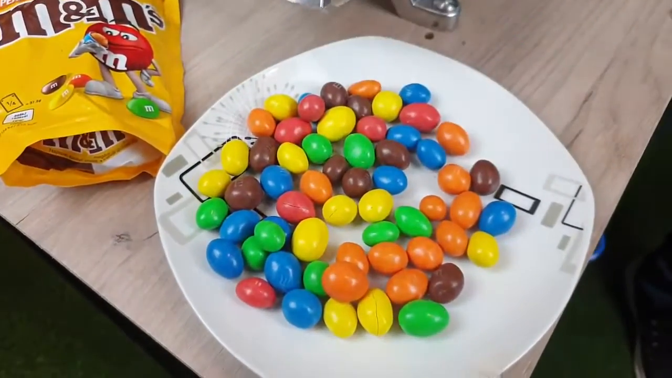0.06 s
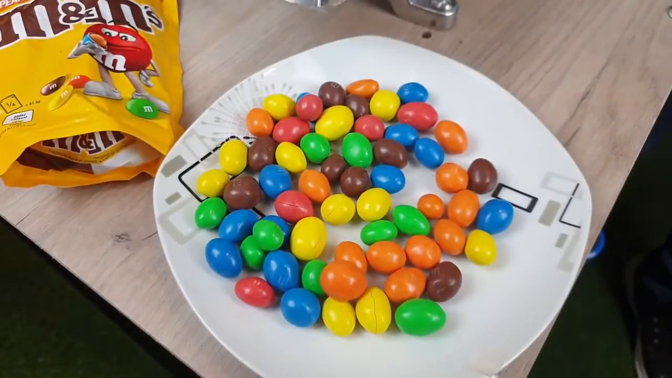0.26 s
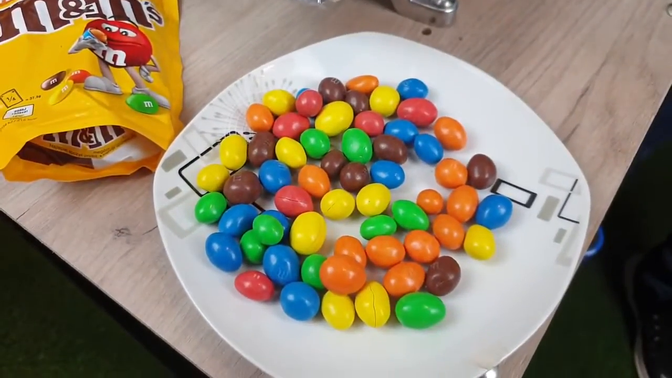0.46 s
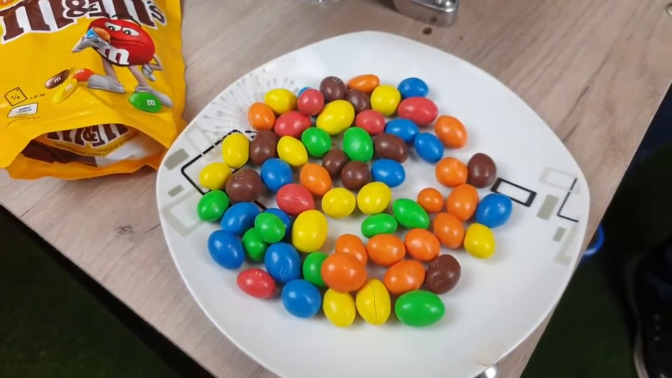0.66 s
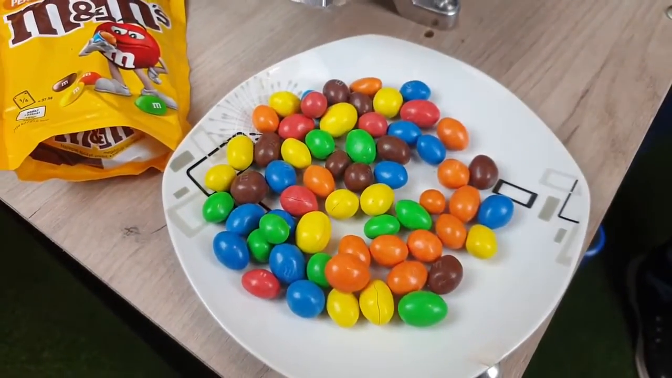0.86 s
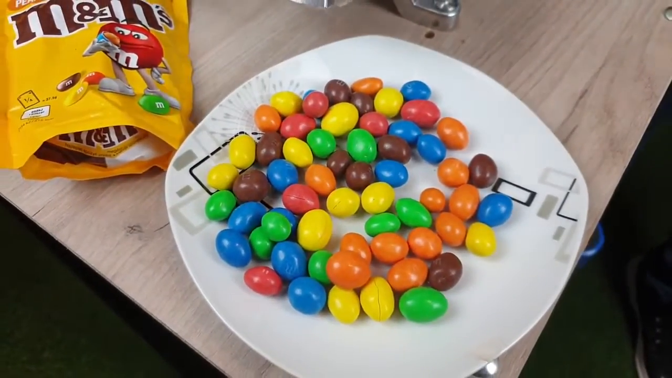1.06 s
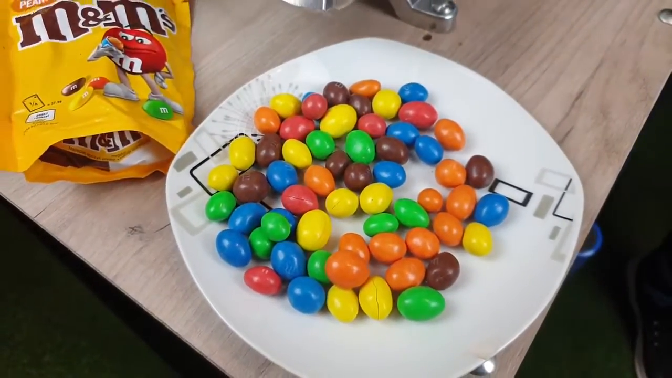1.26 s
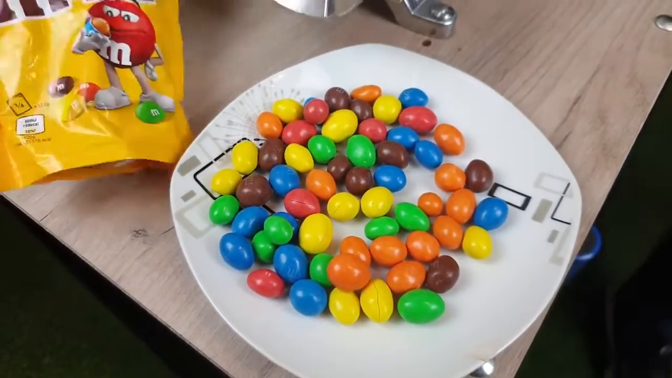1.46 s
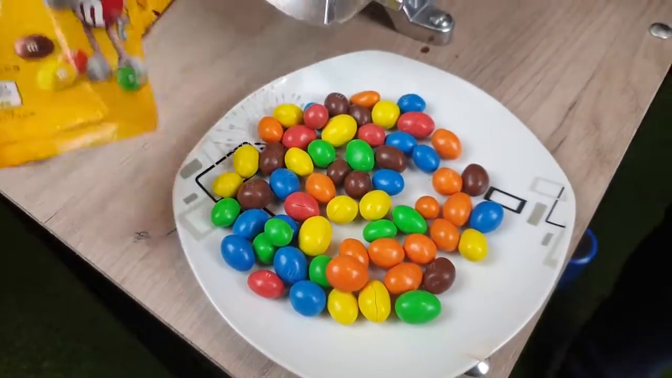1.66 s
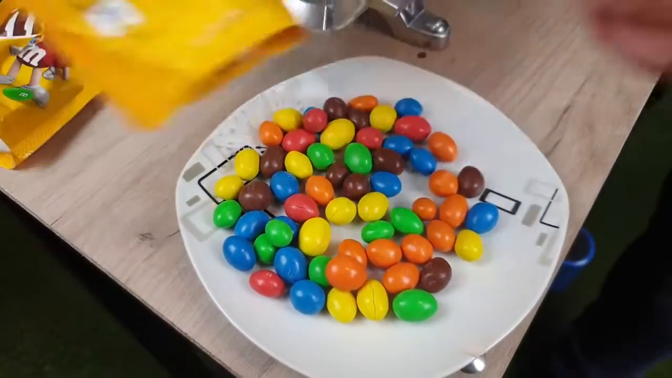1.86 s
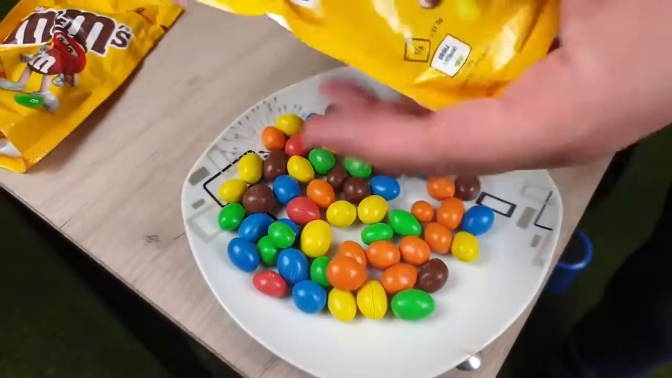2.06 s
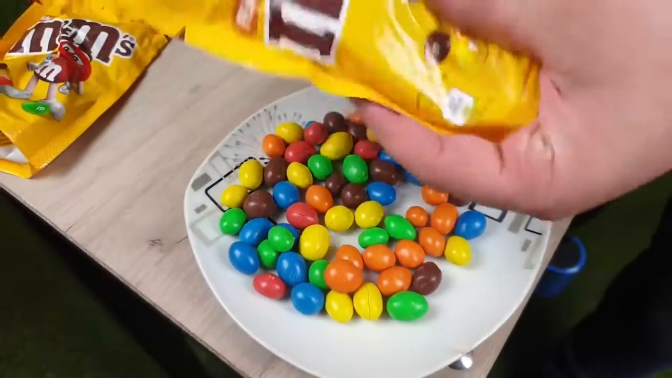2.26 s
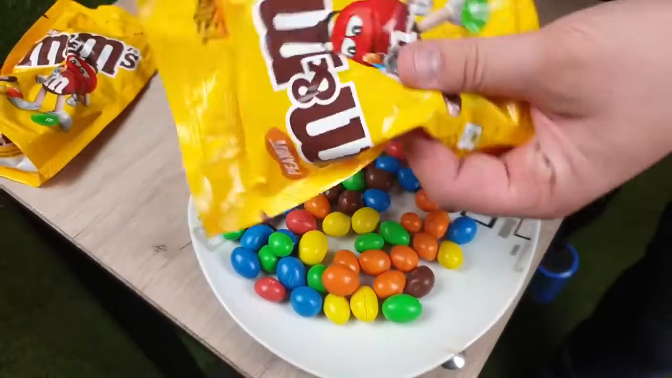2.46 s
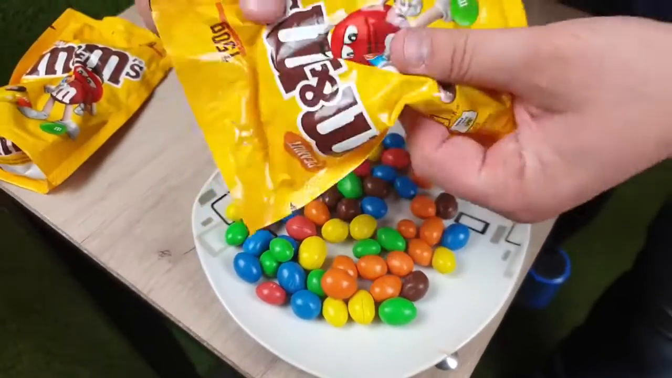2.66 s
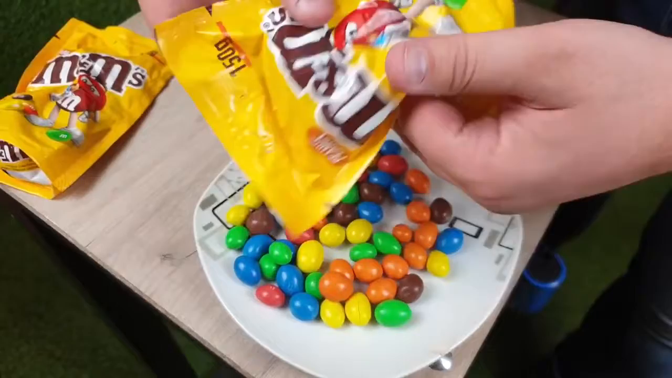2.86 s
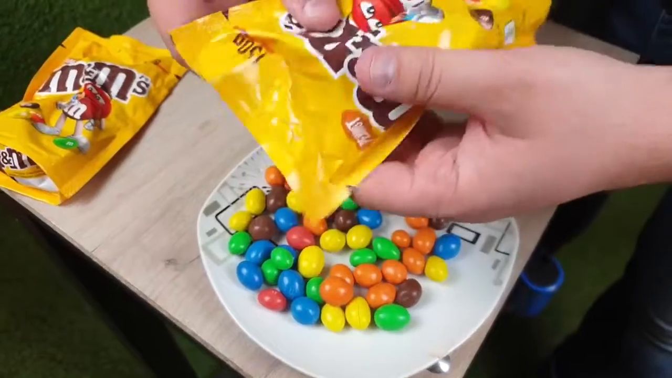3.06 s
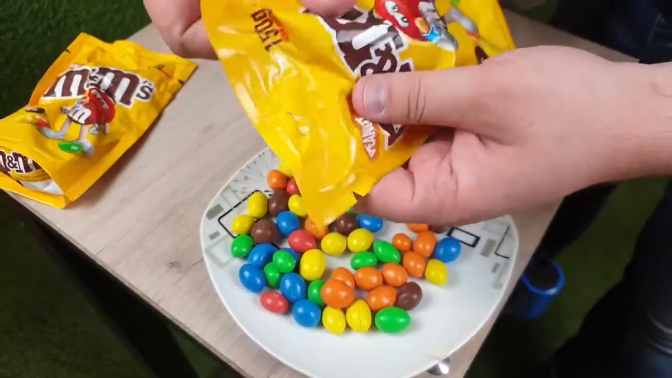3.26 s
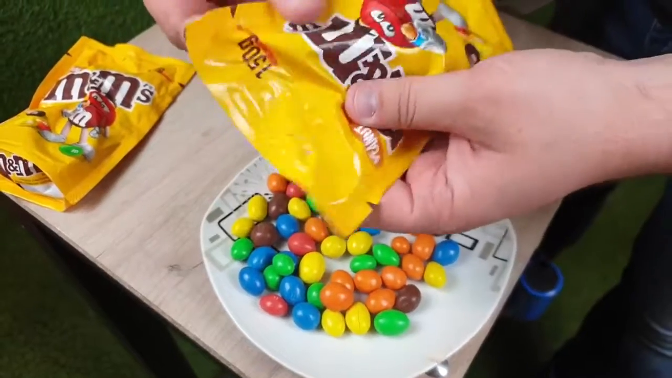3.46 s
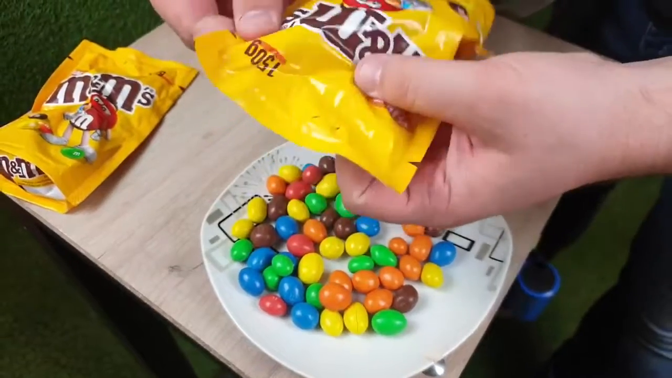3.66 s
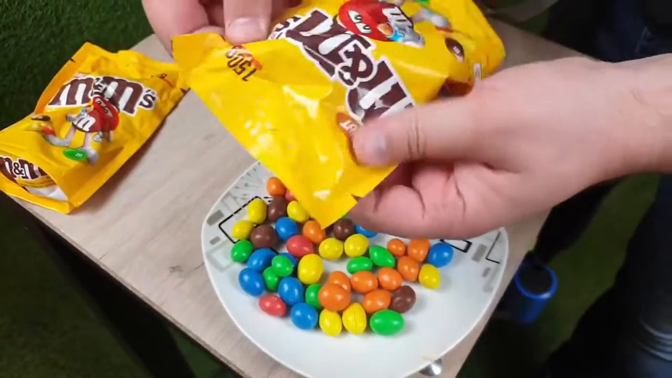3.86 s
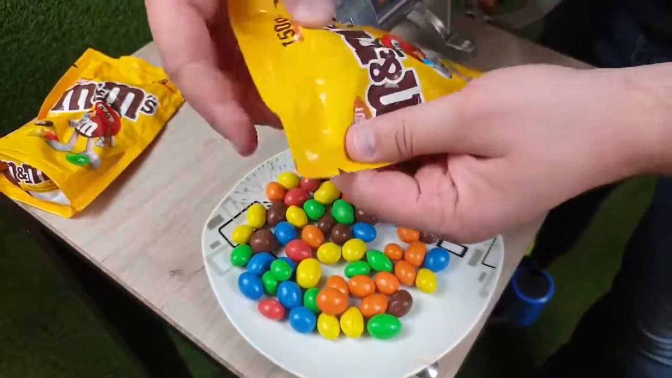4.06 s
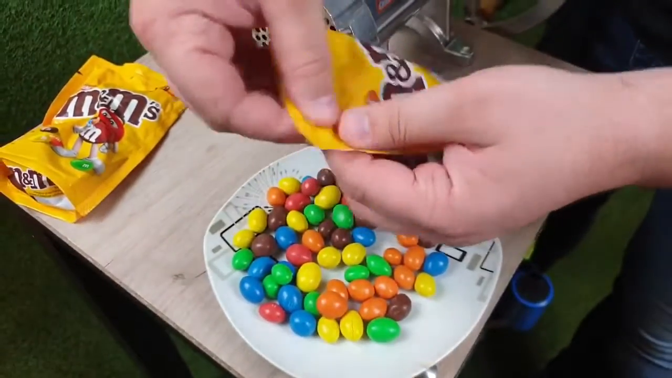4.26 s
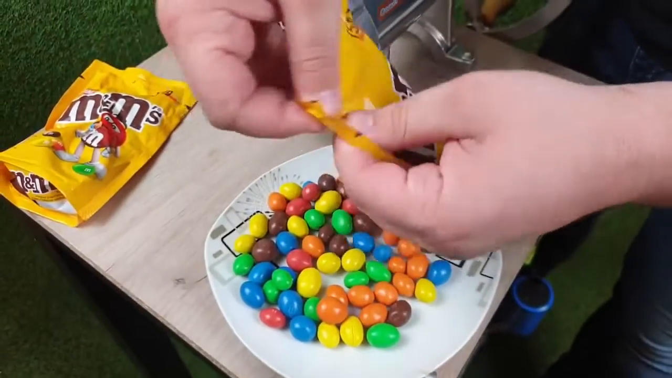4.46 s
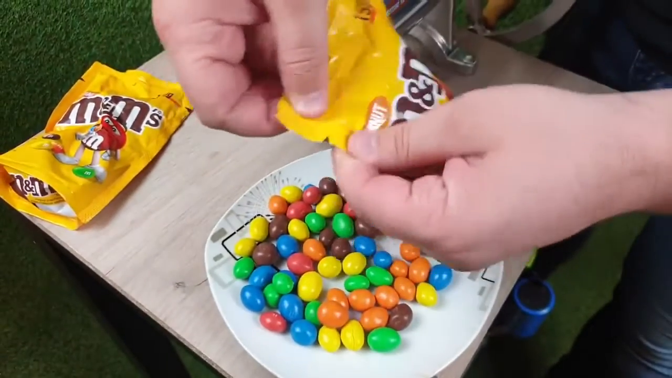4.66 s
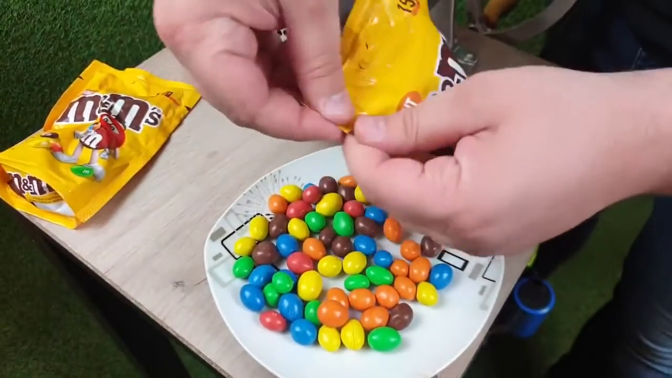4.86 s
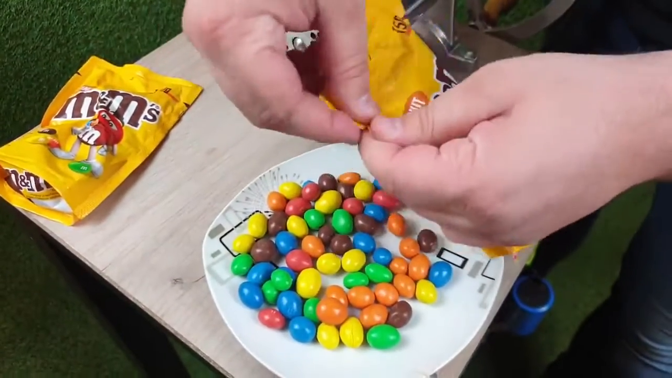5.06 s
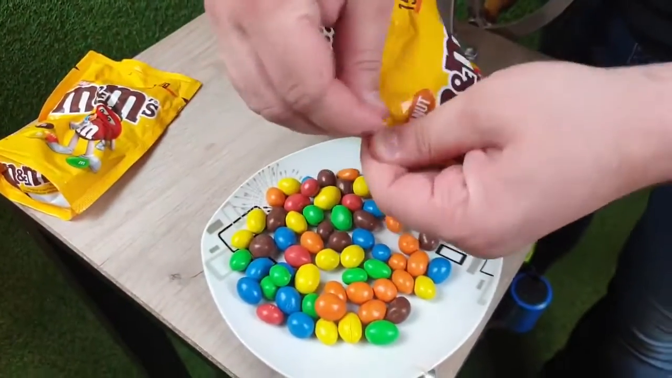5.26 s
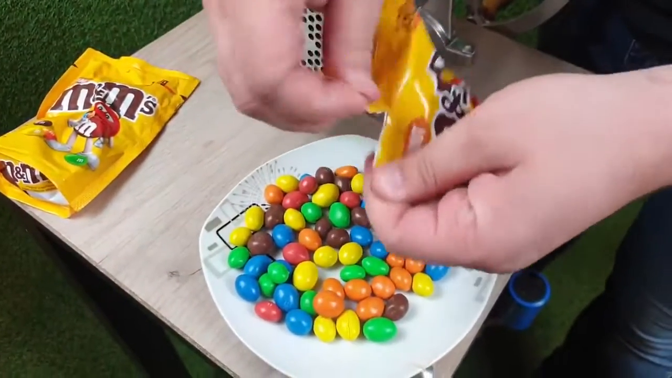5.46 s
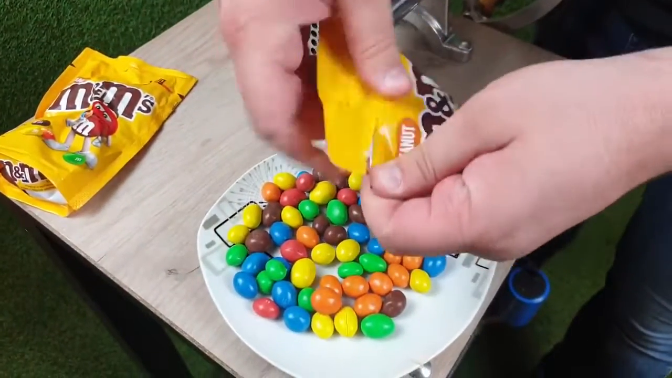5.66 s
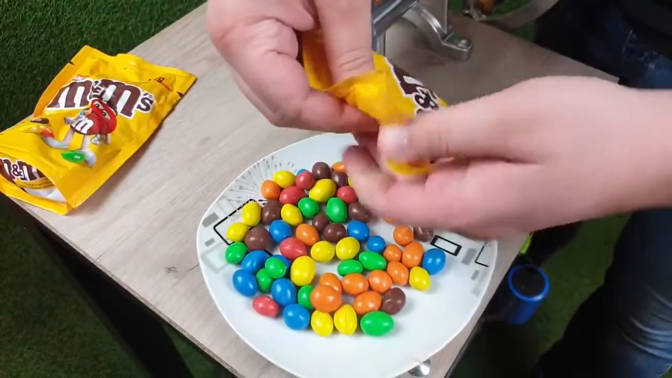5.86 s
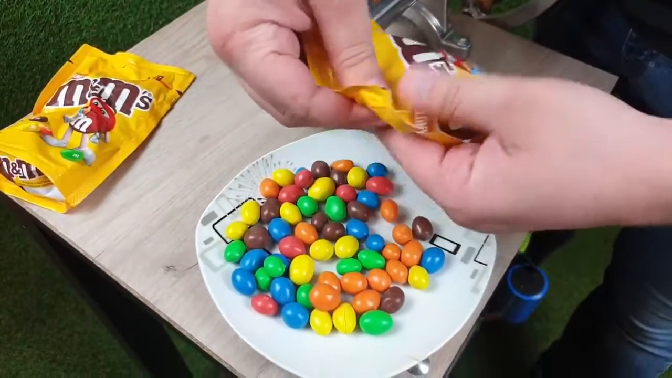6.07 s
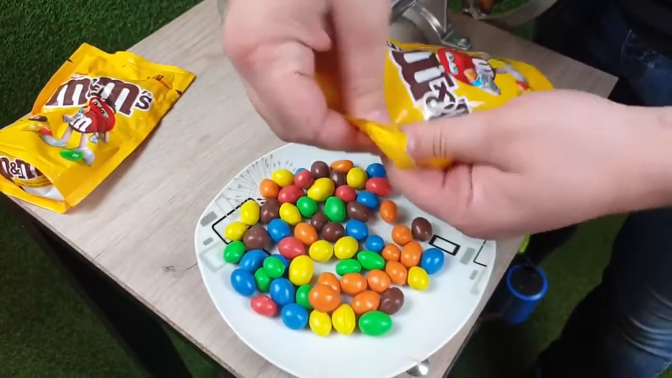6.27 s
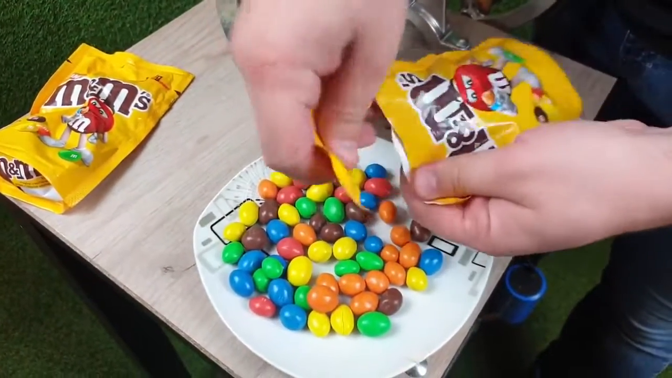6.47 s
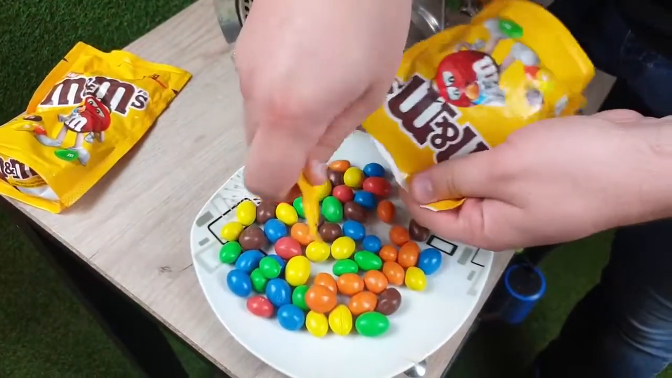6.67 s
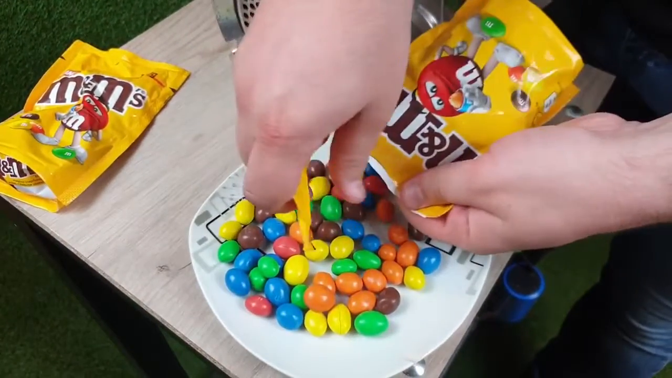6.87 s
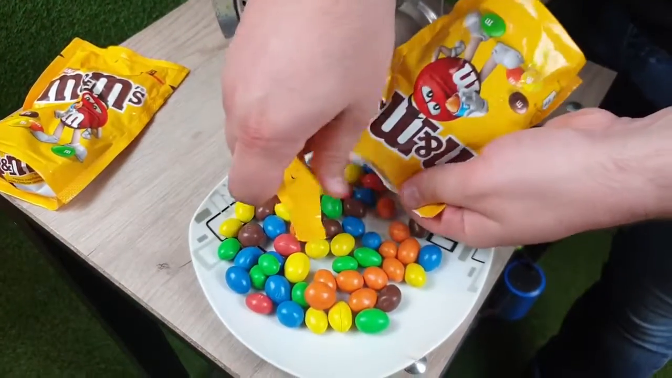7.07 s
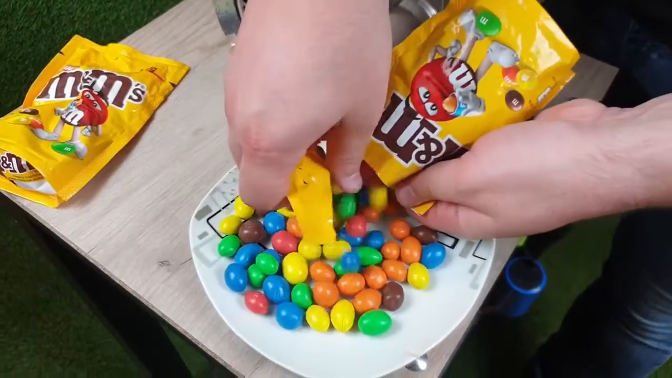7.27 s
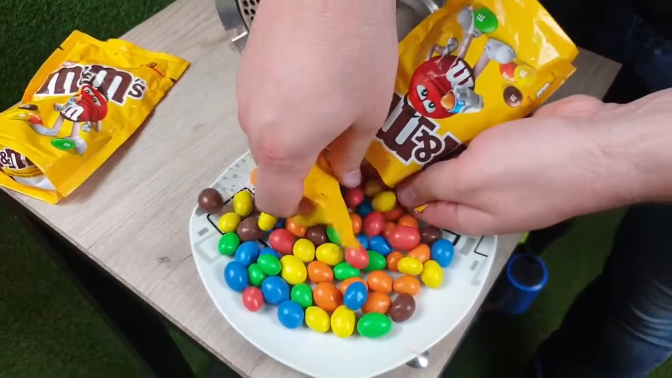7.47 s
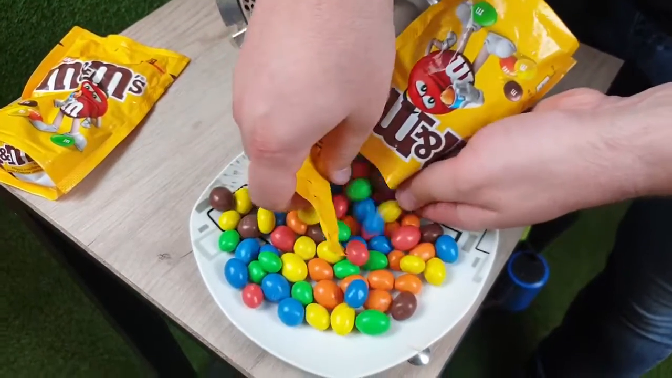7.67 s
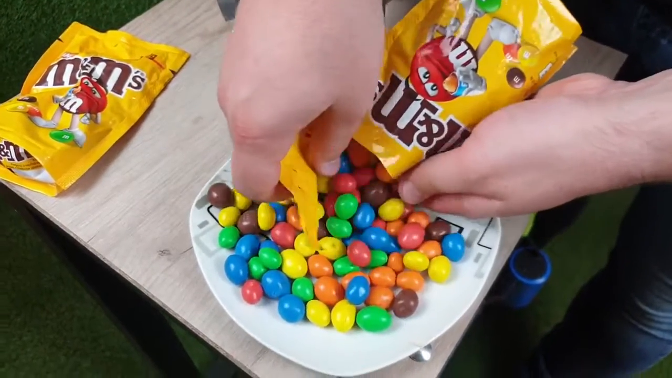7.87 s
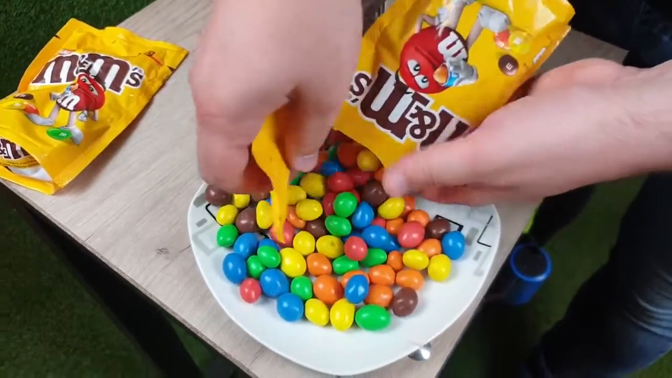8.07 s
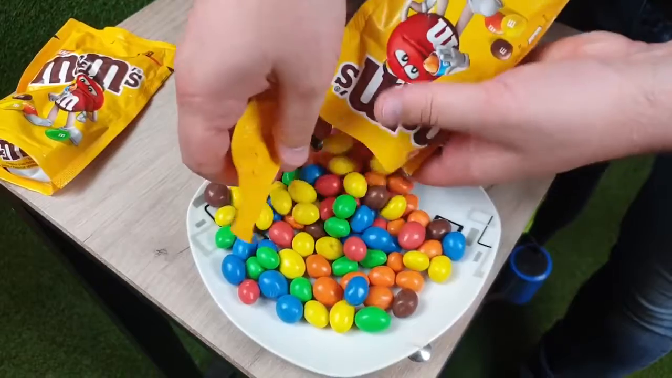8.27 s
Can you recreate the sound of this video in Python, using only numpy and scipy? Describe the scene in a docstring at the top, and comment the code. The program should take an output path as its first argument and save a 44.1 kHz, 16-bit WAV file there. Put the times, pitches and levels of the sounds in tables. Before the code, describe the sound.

Close by in a small room, a thin plastic bag is lifted, crumpled and torn open, giving irregular crackles, sharp snaps and small hollow pops over very faint hiss. Near the end, hard-shelled candies tumble out and click rapidly onto a porcelain plate already holding others, making it ring lightly. The pour dies away in under a second, and a few soft clicks follow as the heap is nudged.

```python
"""A low hum swells and fades a few times over faint hiss and light brushes. Close by, hands lift a
plastic candy bag, crumple it and tear off its top strip: the film buckles under each grip, so creases
snap, panels pop and countless tiny creases merge into a crinkle. Then hard-shelled candies tumble in
the bag and pour onto a porcelain plate already strewn with them: each impact clicks and excites the
plate's modes, which the growing heap damps. A hand nudges the heap. A small room reverberates."""
import sys
import numpy as np
from scipy import signal
from scipy.fft import rfft, irfft, next_fast_len
from scipy.io import wavfile
from scipy.ndimage import uniform_filter1d, map_coordinates

SR = 44100
rng = np.random.default_rng(int(sys.argv[2]) if len(sys.argv) > 2 else 0)


def generate_wav(sig):
    """Save sig (samples, or channels by samples) to the path in sys.argv[1] as 16-bit PCM at SR."""
    pcm = np.round(np.clip(np.atleast_2d(sig).T, -1, 1) * 32767).astype(np.int16)
    wavfile.write(sys.argv[1], SR, pcm)


N = 366471
TIME = np.arange(N) / SR


def amp(db):
    """Amplitude ratio of a level in decibels."""
    return 10 ** (np.asarray(db) / 20)


def unit(x):
    """Normalisation to an rms of 1."""
    return x / np.sqrt(np.mean(x ** 2) + 1e-20)


def fade(t, t60):
    """Exponential free decay, 60 dB down after t60 seconds."""
    return np.exp(-np.log(1000) * t / t60)


def along(points, hz):
    """Interpolation of (frequency, value) points on a logarithmic frequency axis."""
    knots_hz, values = np.transpose(points)
    return np.interp(np.log(hz + 1), np.log(knots_hz), values)


def wobble(rate):
    """Smooth random modulation, with rate knots a second."""
    knots = rng.standard_normal(int(N * rate / SR) + 4)
    return map_coordinates(knots, [np.arange(N) * rate / SR], order=2)


def filtered(x, response):
    """Linear filtering: the spectrum of x times a frequency response."""
    size = next_fast_len(N + SR // 4)
    return irfft(rfft(x, size) * response(np.fft.rfftfreq(size, 1 / SR)), size)[..., :N]


def coloured(x, spectrum):
    """Spectral shaping by (frequency, level) points, at an rms of 1."""
    return unit(filtered(x, lambda hz: amp(along(spectrum, hz))))


def add(track, s, sound):
    """Superposition of a sound on a track from time s."""
    part = track[..., max(round(s * SR), 0):][..., :sound.shape[-1]]
    part += sound[..., :part.shape[-1]]


def swells(rows, attack_s, t60, sag_db_per_s):
    """Power summation, in dB, of (start, length, level) events that rise, hold on a slope and decay."""
    power = np.zeros(N)
    for s, length, db in rows:
        t = np.arange(int((length + t60) * SR)) / SR
        hold = amp(db - sag_db_per_s * (t - length / 2))
        gain = hold * np.minimum(t / attack_s, 1) * fade(np.maximum(t - length, 0), t60)
        add(power, s, gain[max(round(-s * SR), 0):] ** 2)
    return 10 * np.log10(power + 1e-12)


def bursts(times, levels_db, spectrum, t60, after_db, after_t60, ripple_db, size=4096):
    """Impulsive excitation: noise with a two-stage decay drives random resonances, new for each burst."""
    track, t, hz = np.zeros((2, N)), np.arange(size) / SR, np.fft.rfftfreq(size, 1 / SR)
    envelope = fade(t, t60) + amp(after_db) * fade(t, after_t60)
    knots_hz = np.geomspace(200, 18000, 36)
    for s, db in zip(times, levels_db):
        ripple = np.interp(hz, knots_hz, rng.standard_normal(len(knots_hz)))
        cepstrum = irfft(np.log(amp(along(spectrum, hz) + ripple_db * ripple)))
        minimum_phase = np.exp(rfft(2 * cepstrum[:size // 2], size) - cepstrum[0])
        burst = irfft(rfft(envelope * rng.standard_normal((2, size))) * minimum_phase)
        add(track, s, amp(db) * unit(burst) * np.sqrt(.005 * SR / size))  # energy of 5 ms at this level
    return track


# Likeness of left and right: (frequency [Hz], coherence [0 to 1])
COHERENCE = [(100, 0.88), (600, 0.84), (1500, 0.58), (4000, 0.054)]
def placed(pair, balance_db):
    """Partial coherence and a level difference turn two independent signals into one stereo source."""
    def blend(hz):
        angle = np.arccos(np.clip(along(COHERENCE, hz), 0, 1)) / 2
        return np.array([np.cos(angle), np.sin(angle)])

    def lean(hz):
        gain = amp(np.array([[1], [-1]]) * along(balance_db, hz) / 2)
        return gain / np.sqrt(np.mean(gain ** 2, axis=0))
    mid, side = filtered(pair, blend)
    return filtered(np.array([mid + side, mid - side]), lean)


# Decay of the small room: (frequency [Hz], reverberation time [s])
ROOM_T60 = [(150, 0.41), (800, 0.15), (4000, 0.19), (14000, 0.053)]
def room(x):
    """Reverberation: convolution with a diffuse tail whose treble dies first."""
    hz, t, noise = signal.stft(rng.standard_normal((2, SR // 2)), SR, nperseg=256)
    tail = signal.istft(noise * amp(-60 * t / along(ROOM_T60, hz)[:, None]), SR, nperseg=256)[1]
    tail *= 1 - np.exp(-np.arange(tail.shape[1]) / SR / 0.00013)
    return signal.fftconvolve(x, tail / np.linalg.norm(tail[0]), axes=1)[:, :N]


# Spectra of the room hiss and of a brush: (frequency [Hz], relative spectral density [dB])
HISS_SPECTRUM = [(25, -19), (150, -4.5), (500, -13), (1400, -7.5), (3000, -16), (5800, -9), (15000, -24)]
BRUSH_SPECTRUM = [(230, -1), (500, -8.5), (1500, -6.5), (8500, -15)]
# Light brushes before the bag is lifted: (start [s], length [s], level [dB])
BRUSH_STROKES = [(0, 0.04, -66), (.237, 0.022, -66.5), (.585, 0.073, -58)]
def background():
    """Broadband noise: a steady room hiss, and the friction of a few light brushes."""
    hiss = coloured(rng.standard_normal((2, N)), HISS_SPECTRUM)
    brush = coloured(rng.standard_normal((2, N)), BRUSH_SPECTRUM)
    brush_db = swells(BRUSH_STROKES, attack_s=0.0069, t60=0.47, sag_db_per_s=22)
    return amp(-75) * hiss + amp(brush_db) * brush


# Swells of the low hum: (start [s], length [s], relative level [dB])
HUM_SWELLS = [(-.06, 0.2, -56), (.33, 0.36, -54), (.88, 0.53, -48.5), (1.7, 0.57, -51)]
def hum(pitch_hz=66.5):
    """Amplitude and frequency modulation: a low tone swells and wavers."""
    level_db = swells(HUM_SWELLS, attack_s=0.13, t60=0.57, sag_db_per_s=-9) - 7
    hz = pitch_hz + 0.5 * wobble(7.6)
    return amp(level_db) * unit(np.sin(2 * np.pi * np.cumsum(hz) / SR))


# Bumps of the filled bag in the hands: (time [s], level [dB], nominal pitch [Hz])
BAG_BUMPS = [(3.038, -32, 58.7), (3.576, -43, 131), (4.04, -40, 197), (4.899, -37, 116), (5.175, -41, 128),
             (5.78, -28.5, 101), (6.928, -39, 88)]
def bumps():
    """Soft impact: the heavy bag settles on the fingers with a sinking tone in a puff of rumble."""
    track, t = np.zeros((2, N)), np.arange(SR // 4) / SR
    envelope = fade(t, 0.049) * (1 - np.exp(-t / 0.0017))
    for s, db, hz in BAG_BUMPS:
        sinking_hz = hz * (0.92 + .5 * fade(t, 0.027))
        tone = np.sin(2 * np.pi * np.cumsum(sinking_hz) / SR)
        rumble = unit(signal.lfilter(*signal.butter(2, hz, fs=SR), rng.standard_normal((2, len(t)))))
        add(track, s, amp(db - 0.5) * (tone + .5 * rumble) * envelope)
    return track


HOLD_FROM_S, HOLD_TO_S = 1.35, 7.3  # the bag is in the hands
TAUT_UNTIL_S, SLACK_FROM_S = 1.95, 2.45  # the other hand takes its weight
# Colour of taut panels against slack ones: (frequency [Hz], gain [dB])
TAUT_COLOUR = [(300, 1.5), (850, -2), (1300, -6.5), (2000, 6.5), (3500, 1)]
def taut(panels):
    """Membrane tension: the panels sound higher while the weight of the candies stretches the film."""
    stretch = np.interp(TIME, [TAUT_UNTIL_S, SLACK_FROM_S], [1, 0])
    return panels + stretch * filtered(panels, lambda hz: amp(along(TAUT_COLOUR, hz)) - 1)


def short_rings(rows, t60=0.012):
    """Damped oscillation: one brief tone for each (time, level, pitch) row."""
    track, t = np.zeros((2, N)), np.arange(SR // 20) / SR
    for s, db, hz in rows:
        phase_cycles = np.array([[0], [rng.random()]])
        ring = np.sin(2 * np.pi * (hz * t + phase_cycles))
        add(track, s, amp(db) * ring * fade(t, t60) * (1 - np.exp(-t * hz)))
    return track


# Hollow pops of the bag, and dull knocks of candies tumbling inside just before the pour:
# (time [s], relative level [dB], pitch [Hz])
POPS_AND_KNOCKS = [(2.576, -30.5, 1010), (2.717, -36, 1550), (3.261, -25.5, 860), (3.695, -33.5, 915),
                   (4.336, -37, 840), (5.116, -40.5, 1000), (6.829, -33.5, 1650), (3.8, -36.5, 358),
                   (4.45, -28, 870), (4.65, -37.5, 388), (3.948, -35.5, 1200), (5.286, -36, 980),
                   (7.247, -33, 1140), (7.274, -37, 1680), (7.298, -34.5, 467), (8.008, -47, 1500),
                   (8.099, -46, 1110)]
def pops_and_knocks(flex_db, count=320, centre_hz=1030, spread_db=10):
    """Resonance: the hollow bag rings as panels pop or candies knock; random pops follow its flexing."""
    clear = amp(16.5) * short_rings(POPS_AND_KNOCKS)
    slot, strength, pitch = rng.random((count, 3)).T
    times = SLACK_FROM_S + (np.arange(count) + slot) / count * (N / SR - SLACK_FROM_S)
    levels_db = np.interp(times, TIME, flex_db) - 5 + spread_db * strength ** 2
    hz = centre_hz * 2 ** (2 * pitch - 1)  # within an octave either way
    return clear + short_rings(zip(times, levels_db, hz))


# Spectra of a cracking crease and a flapping panel: (frequency [Hz], relative spectral density [dB])
CREASE_SPECTRUM = [(600, -46), (1800, -17.5), (2800, -4.5), (5200, 3), (6700, -1), (8200, -8),
                   (10500, -4.5), (13000, -9.5), (15800, -9.5)]
PANEL_SPECTRUM = [(50, -23.5), (150, -21), (300, -12.5), (550, -8.5), (850, -1), (1600, -2.5), (2300, -7.5),
                  (4000, -7), (9000, -97.5)]
# The loudest creases: (time [s], crack level [dB], flap level [dB])
CREASE_SNAPS = [(0.04, -58, -55), (1.359, -35.5, -44), (1.3878, -26, -48), (1.4712, -26.5, -31.5),
                (1.555, -32.5, -34), (1.6311, -14.5, -33), (1.6663, -22.5, -44), (1.6892, -19, -23.5),
                (1.753, -26, -30.5), (1.797, -29, -40), (1.812, -20, -28), (1.9042, -29.5, -32.5),
                (1.9358, -31.5, -32.5), (2.0168, -21, -35), (2.0202, -30.5, -29), (2.04, -31.5, -34),
                (2.1027, -26, -33.5), (2.111, -30, -47), (2.164, -17, -42), (2.2296, -22.5, -21),
                (2.253, -22, -25), (2.313, -22, -35), (2.3495, -21.5, -20.5), (2.375, -16, -21),
                (2.4123, -16.5, -18), (2.606, -21, -25.5), (2.778, -25.5, -39), (2.795, -26.5, -45),
                (2.826, -28.5, -31), (2.8481, -25, -44), (2.9095, -25.5, -31), (2.992, -21.5, -27.5),
                (3.033, -16.5, -30), (3.153, -30.5, -32), (3.205, -21.5, -38), (3.2814, -16, -29),
                (3.3922, -18, -26), (3.413, -20.5, -28), (3.5743, -26.5, -38), (3.628, -28, -34),
                (3.7293, -21, -29.5), (3.767, -23.5, -35.5), (3.878, -35.5, -41), (3.901, -33.5, -37.5),
                (3.9212, -25.5, -37), (3.985, -22, -29.5), (4.011, -26, -31.5), (4.028, -21.5, -32),
                (4.086, -27.5, -30), (4.1199, -27.5, -29), (4.2142, -30.5, -42), (4.2995, -31, -35),
                (4.315, -21, -39), (4.495, -24.5, -50), (4.763, -21, -31), (4.8179, -26, -34),
                (4.845, -36, -54), (4.915, -31, -35.5), (4.959, -29.5, -32.5), (5.056, -25.5, -41),
                (5.3008, -25.5, -32.5), (5.373, -27.5, -33), (5.408, -30.5, -32.5), (5.434, -20.5, -44),
                (5.4937, -26, -30), (5.527, -24, -30.5), (5.61, -30.5, -29.5), (5.674, -29.5, -30.5),
                (5.705, -29.5, -26.5), (5.7686, -21, -28), (5.8633, -26, -21.5), (5.9244, -20, -31.5),
                (6.1, -29.5, -28.5), (6.2228, -31.5, -34), (6.318, -21.5, -25.5), (6.392, -24.5, -30),
                (6.5403, -23, -40), (6.545, -16, -31), (6.599, -28.5, -30.5), (6.7993, -21.5, -23),
                (6.9233, -37.5, -33.5), (6.993, -36.5, -41.5), (7.0501, -21, -25.5), (7.2411, -28, -27.5)]
def snaps():
    """Snap-through buckling: a crease cracks and flaps the panel around it."""
    times, crack_db, flap_db = np.transpose(CREASE_SNAPS)
    cracks = bursts(times, crack_db, CREASE_SPECTRUM, t60=.011, after_db=-11, after_t60=.036, ripple_db=3)
    flaps = bursts(times, flap_db, PANEL_SPECTRUM, t60=.0044, after_db=-9, after_t60=.047, ripple_db=3)
    return cracks, flaps


def ticks(level_db, count=150, spread_db=9, ceiling_db=-25):
    """Local buckling: single small creases stand out of the crinkle at random moments."""
    slot, strength = rng.random((count, 2)).T
    times = HOLD_FROM_S + (np.arange(count) + slot) / count * (HOLD_TO_S - HOLD_FROM_S)
    tick_db = np.minimum(np.interp(times, TIME, level_db) + spread_db * strength, ceiling_db)
    return bursts(times, tick_db, CREASE_SPECTRUM,
                  t60=.007, after_db=-16, after_t60=.03, ripple_db=5.5, size=1024)


def crinkle(spectrum, level_db, rate, scatter_db, t60, rub, patchy_db, onset_rate):
    """Shot noise of tiny creases over sliding friction: harder handling makes it louder and denser."""
    creases_per_s = rate * amp(.8 * (level_db + 42))
    buckles = rng.random(N) < creases_per_s / SR
    sizes = buckles * amp(scatter_db * np.minimum(rng.standard_normal(N), 1.7))
    power = signal.lfilter([1], [1, -fade(2 / SR, t60)], sizes ** 2)
    power /= np.abs(uniform_filter1d(power, size=3000)) + 1e-9
    crease_share = (1 - rub) / (1 + (onset_rate / creases_per_s) ** 2)  # below onset_rate, mostly sliding
    crackle = np.sqrt(1 - crease_share + crease_share * power) * rng.standard_normal((2, N))
    # the colour flickers in small patches of frequency and time
    spectrogram = signal.stft(crackle, nperseg=128)[2]
    patches = uniform_filter1d(rng.standard_normal(spectrogram.shape[1:]), size=7, axis=0)
    patches = unit(uniform_filter1d(patches, size=8, axis=1))
    grains = signal.istft(spectrogram * amp(patchy_db * patches), nperseg=128)[1][:, :N]
    fingers_db = 1.6 * wobble(45)  # the fingers move in fits and starts
    return amp(level_db + fingers_db) * coloured(grains, spectrum)


def effort(rows, held_db=-55.5):
    """Relaxation: the film's level in dB jumps at each grip, sags, and settles to a faint stirring."""
    gripped = amp(swells(rows, attack_s=0.011, t60=0.12, sag_db_per_s=5))
    held = amp(held_db) * (TIME > HOLD_FROM_S) * (TIME < HOLD_TO_S)
    return 20 * np.log10(np.hypot(gripped, held))


# Grips, squeezes and pulls: (start [s], length [s], fine crinkle level [dB], panel flexing level [dB])
HAND_GRIPS = [(1.269, 0.12, -56.5, -63.5), (1.358, 0.048, -39.5, -43), (1.48, 0.14, -48, -50.5),
              (1.677, 0.053, -44, -42), (1.612, 0.11, -35.5, -33.5), (1.801, 0.048, -42.5, -40),
              (1.882, 0.046, -40.5, -42), (2.108, 0.095, -38, -42.5), (2.16, 0.12, -29.5, -31.5),
              (2.325, 0.043, -28, -30.5), (2.359, 0.098, -23, -28.5), (2.448, 0.27, -36, -36.5),
              (2.748, 0.11, -50, -43), (2.945, 0.096, -37, -39), (3.022, 0.063, -27.5, -31.5),
              (3.079, 0.1, -39, -39.5), (3.213, 0.18, -31, -37.5), (3.379, 0.029, -25, -30.5),
              (3.44, 0.083, -46, -48.5), (3.642, 0.074, -33, -38), (3.777, 0.07, -42, -40),
              (4.008, 0.12, -38, -44), (4.285, 0.25, -42, -45), (4.427, 0.11, -31, -37.5),
              (4.543, 0.24, -37.5, -41.5), (4.808, 0.16, -46.5, -49), (5.356, 0.15, -43.5, -41),
              (5.487, 0.08, -35, -37), (5.579, 0.14, -41, -43), (5.749, 0.12, -33, -37.5),
              (5.888, 0.24, -39.5, -41.5), (6.313, 0.066, -51, -40.5), (6.377, 0.15, -35, -41.5),
              (6.429, 0.076, -33, -35.5), (6.615, 0.29, -44, -45), (7.074, 0.19, -50, -53),
              (7.244, 0.11, -33.5, -40), (7.328, 0.64, -50, -50.5), (8.027, 0.32, -60, -59.5)]
def bag():
    """Crumpling of a thin film: each grip buckles countless creases and flexes the panels between."""
    cracks, flaps = snaps()
    start, length, grip_fine_db, grip_flex_db = np.transpose(HAND_GRIPS)
    fine_db = effort(zip(start, length, grip_fine_db))
    flex_db = effort(zip(start, length, grip_flex_db))
    fine = crinkle(CREASE_SPECTRUM, fine_db - 1,
                   rate=190, scatter_db=6, t60=.012, rub=.15, patchy_db=2.8, onset_rate=25)
    flex = crinkle(PANEL_SPECTRUM, flex_db + 1,
                   rate=160, scatter_db=6, t60=.017, rub=.28, patchy_db=3.5, onset_rate=140)
    hollow = pops_and_knocks(flex_db)
    return cracks + ticks(fine_db) + fine + taut(flaps + flex) + hollow


# Low modes of the whole plate: (frequency [Hz], level against a contact [dB])
PLATE_LOW_MODES = [(393, -57), (468, -57), (657, -52)]
def plate_low_ring(times, levels_db, t60=1.3):
    """Free vibration: a contact leaves the whole plate ringing faintly, low and long."""
    track, t = np.zeros((2, N)), np.arange(SR) / SR
    modes = [amp(db) * np.exp(2j * np.pi * hz * t) * fade(t, t60) for hz, db in PLATE_LOW_MODES]
    for s, db in zip(times, levels_db):
        for mode in modes:
            add(track, s, amp(db) * (mode * np.exp(2j * np.pi * rng.random())).real)
    return track


# Thud of the table under the plate: (frequency [Hz], relative spectral density [dB])
THUD_SPECTRUM = [(80, -4), (200, -12), (600, -37), (2000, -82)]
def table_thuds(times, levels_db, cushion_db_per_s=30):
    """Structure-borne sound: contacts thud through the table, ever less as the heap cushions them."""
    thud_db = levels_db - cushion_db_per_s * (times - min(times))
    return bursts(times, thud_db, THUD_SPECTRUM, t60=.03, after_db=-12, after_t60=.08, ripple_db=2)


# High modes of the porcelain: (frequency [Hz], relative level [dB], left minus right [dB])
PLATE_MODES = [(1863, -21, 12), (2120, -10, 11), (2830, -19, -5), (3450, -9, -4), (3515, -9, -3),
               (3585, -12, 5), (3795, -14, 11), (3994, -11, 6), (5205, -6, 2), (5400, -3, 0),
               (5460, -1, -2), (5522, -2, -2), (7040, -3.5, 12), (7810, -19, 4), (8340, -21, 2),
               (9120, -9, 11), (9325, -6, 18), (9580, -12, 9), (10130, -19, 15), (12060, -16, 7),
               (12610, -22, 4), (12830, -24, 4), (14170, -30, 4), (15260, -26, 3)]
def plate_ring(times, levels_db, t60=.085, damping_per_s=2.6, muffle_db_per_s=9.5, rise_per_s=.012):
    """Modal superposition: each contact strikes a new spot; the heap damps the modes, which creep up."""
    track, t = np.zeros((2, N)), np.arange(SR // 15) / SR
    hz, mode_db, side_db = np.transpose(PLATE_MODES)
    sides = amp(np.array([side_db, -side_db]) / 2)
    sides /= np.linalg.norm(sides, axis=0)
    for s, db in zip(times, levels_db):
        elapsed = s - min(times)
        strength = sides * amp(mode_db + 3.5 * rng.standard_normal(hz.shape))
        pitch = hz * (1 + rise_per_s * elapsed + .0011 * rng.standard_normal(hz.shape))
        phase = (2 * np.pi * np.outer(pitch, t)).astype(np.float32)
        offset = 2 * np.pi * rng.random(sides.shape)
        ring = (strength * np.cos(offset)) @ np.sin(phase) + (strength * np.sin(offset)) @ np.cos(phase)
        envelope = fade(t, t60 / (1 + damping_per_s * elapsed)) * (1 - np.exp(-t / 0.0004))
        add(track, s, amp(db - muffle_db_per_s * elapsed) * unit(ring * envelope))
    return track


# Bright candy click, with a narrow gap near 11 kHz that is not the shell's own:
# (frequency [Hz], relative spectral density [dB])
CLICK_SPECTRUM = [(100, -29), (600, -18), (1500, -15.5), (2200, -6), (2700, -6), (3900, -0.5), (5400, 4.5),
                  (6100, -5.5), (8500, -15), (9700, -13), (11400, -29), (12400, -17), (13500, -34)]
def candy_clicks(times, levels_db):
    """Hard impact: a brief contact radiates a bright click."""
    return bursts(times, levels_db, CLICK_SPECTRUM, t60=.012, after_db=-14, after_t60=.04, ripple_db=4)


# The full flow, the last trickle and a nudge of the hand stir the heap: (start [s], length [s], level [dB])
HEAP_STIRS = [(7.318, 0.25, -13.5), (7.58, 0.29, -23), (8.155, 0.14, -35.5)]
def jostling(hits, count=160, spread_db=10):
    """Granular collisions: times and levels of the small contacts between neighbours in the heap."""
    slot, weakness = rng.random((count, 2)).T
    times = min(hits) + np.ptp(hits) * (np.arange(count) + slot) / count
    stir_db = swells(HEAP_STIRS, attack_s=0.011, t60=0.36, sag_db_per_s=12)
    return times, np.interp(times, TIME, stir_db) - spread_db * weakness


# Stereo balance of the candies on the plate: (frequency [Hz], left minus right [dB])
CANDY_BALANCE = [(700, 3), (2100, 8.5), (2900, -4), (4400, 15), (5600, 7), (9400, -2)]
# Candy contacts on the plate: landings, then a few light ticks as the heap is nudged:
# (time [s], level [dB])
CANDY_CONTACTS = [(7.3177, -8.5), (7.3297, -11.5), (7.3498, -13), (7.3592, -12), (7.3905, -10),
                  (7.4041, -7), (7.4221, -8), (7.463, -11), (7.476, -9), (7.4836, -11.5), (7.5284, -9),
                  (7.5452, -10), (7.5783, -6.5), (7.585, -8), (7.6003, -12.5), (7.615, -16),
                  (7.6373, -14.5), (7.667, -20), (7.69, -25), (7.7064, -17.5), (7.743, -22.5),
                  (7.7614, -15), (7.773, -21.5), (7.786, -16), (7.8238, -15.5), (7.836, -26),
                  (7.8475, -16.5), (7.881, -26), (7.9137, -13.5), (8.004, -31.5), (8.0645, -30.5),
                  (8.186, -26), (8.247, -33), (8.293, -28.5)]
def candies(rebound_s=.006, rebound_db=-10.5):
    """Inelastic collision: a falling or nudged candy hits and rebounds, clicking and ringing the plate."""
    hits, hit_db = np.transpose(CANDY_CONTACTS)
    rebounds = hits + rebound_s * (.5 + rng.random(len(hits)))
    jostles, jostle_db = jostling(hits)
    contacts = np.concatenate([hits, rebounds, jostles])
    contact_db = np.concatenate([hit_db, hit_db + rebound_db, jostle_db])
    clicks = candy_clicks(contacts, contact_db - 8.5)
    ring = plate_ring(contacts, contact_db - 12.5)
    thuds = table_thuds(hits, hit_db - 36.5)
    low_ring = plate_low_ring(hits, hit_db)
    return placed(clicks + thuds + low_ring, CANDY_BALANCE) + ring


# Stereo balance of the bag and the background: (frequency [Hz], left minus right [dB])
BAG_BALANCE = [(180, 3.5), (550, 5.5), (4970, 3)]
def scene():
    """Direct and reverberant sound add: bag and plate are close by, a little to the left."""
    film = placed(bag(), BAG_BALANCE)
    pour = candies()
    low = (bumps() + hum()) * amp([[1.6], [-2.6]])
    reverberation = amp(-11.5) * room(film) + amp(-6) * room(pour)
    return film + pour + low + reverberation + placed(background(), BAG_BALANCE)


def record(dry, lead_s=7e-5, top_hz=16000):
    """Arrival-time difference: the left channel leads; the loudest peaks clip and the top is cut."""
    arrived = filtered(dry, lambda hz: np.exp(1j * np.pi * hz * np.array([[1], [-1]]) * lead_s))
    return filtered(np.clip(arrived, -1, 1), lambda hz: hz < top_hz)


dry = scene()
out = record(dry)
generate_wav(out)
```